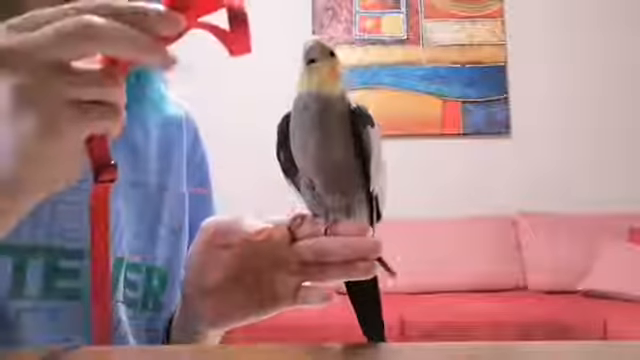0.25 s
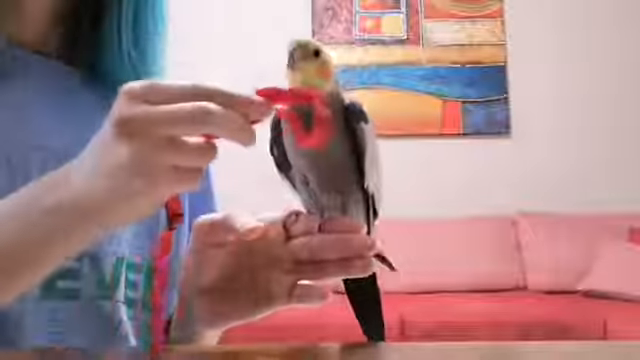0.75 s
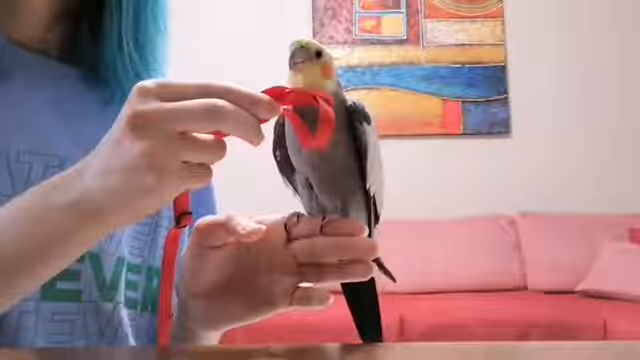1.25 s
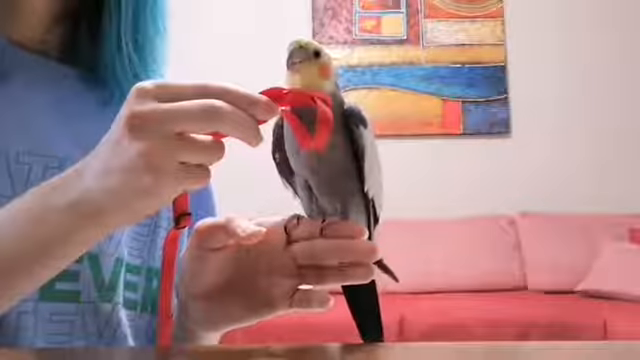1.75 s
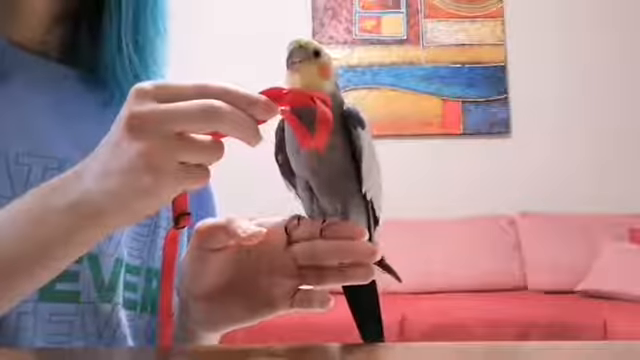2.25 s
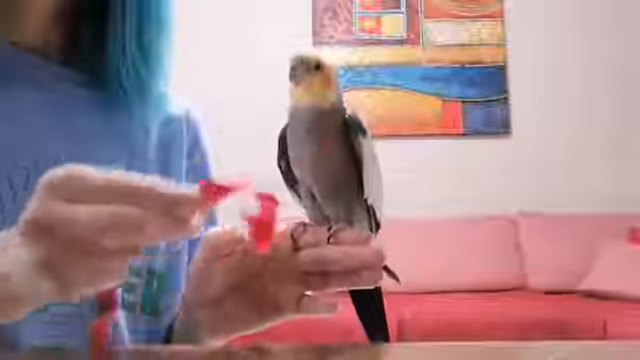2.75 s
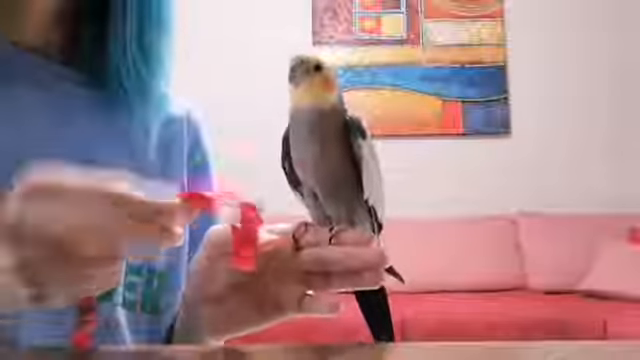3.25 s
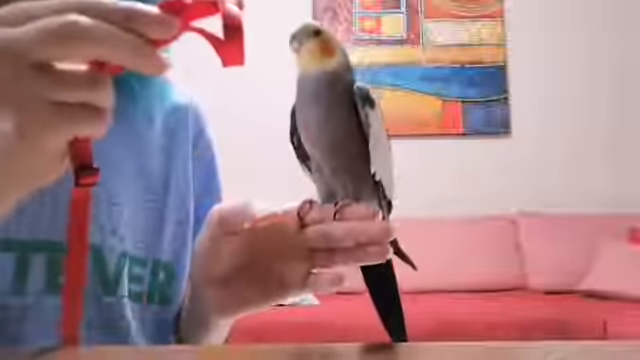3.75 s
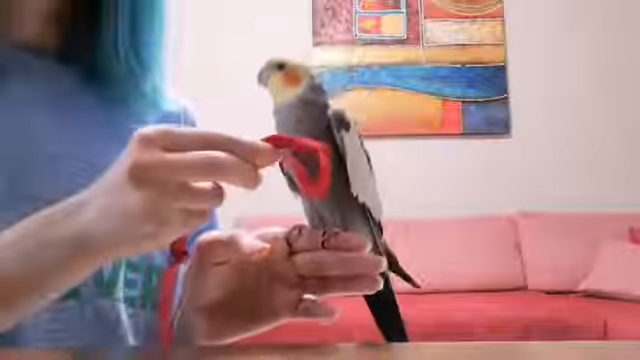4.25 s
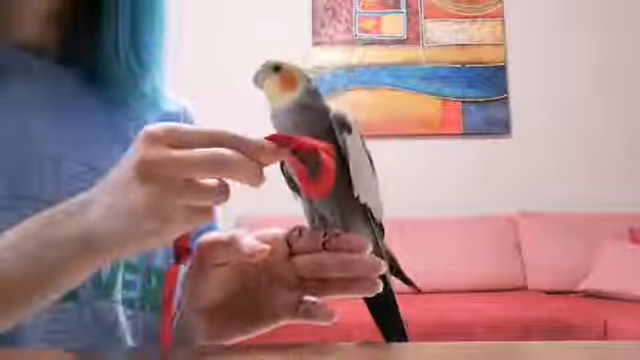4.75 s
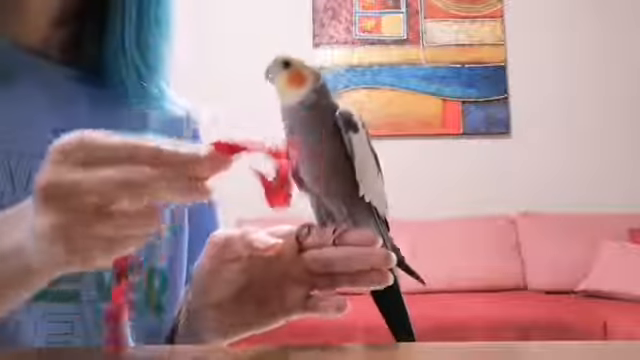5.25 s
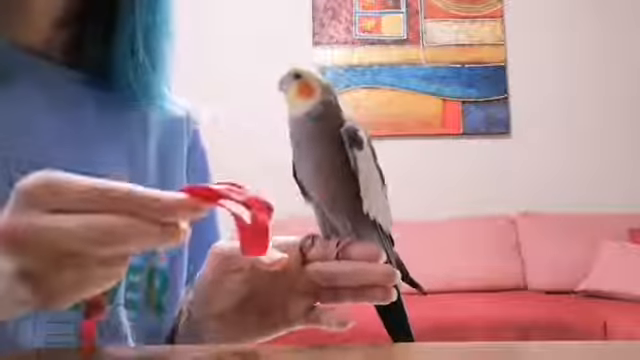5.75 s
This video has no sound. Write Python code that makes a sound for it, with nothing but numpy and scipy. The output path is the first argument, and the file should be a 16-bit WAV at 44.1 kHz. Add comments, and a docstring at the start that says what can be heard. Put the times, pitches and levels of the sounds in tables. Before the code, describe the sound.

A cockatiel protests close to two microphones in a living room with short reverberation. A nasal chirp breaks upward, followed by a tiny squawk and soft sagging whine. A long, raspy, fast-throbbing screech sinks and clears. After a pause come another chirp, a clipped squawk, a shorter, purer screech, faint beak clicks and a hissed squawk sliding into a whine. Quiet room tone and faint rumble lie beneath.

```python
"""A cockatiel on a hand in a living room protests at a harness held up to it. Its syrinx is a phase oscillator
with overtones, half-pitch tones and coloured noise: two nasal chirps, each followed by a squawk, a soft whine
after the first squawk, two throbbing screeches that sink in pitch, and a hissed squawk sliding into a whine.
Two microphones stand close by; the table adds a delayed copy and decaying noise tails make the room ring.
A faint room tone lies beneath, with a low rumble that swells now and then."""
import sys
import numpy as np
from scipy import signal
from scipy.fft import rfft, irfft, next_fast_len
from scipy.io import wavfile
from scipy.ndimage import map_coordinates

SR = 44100
rng = np.random.default_rng(int(sys.argv[2]) if len(sys.argv) > 2 else 0)


def generate_wav(signal):
    """Clip the signal to [-1, 1] and save it as 16-bit WAV at the path in sys.argv[1]."""
    frames = np.transpose(np.atleast_2d(signal))
    scaled = np.clip(frames, -1, 1) * 32767
    pcm = np.round(scaled).astype(np.int16)
    wavfile.write(sys.argv[1], SR, pcm)


N = 265041
TIME = np.arange(N) / SR

# overtones of the whistled voice, before the gain each call gives them: multiple of the pitch, level/dB
VOICE_OVERTONES = [(2, -25), (3, -51.5), (4, -49), (5, -57), (6, -63.5), (8, -57)]
# noise spectrum of the irregular syrinx in squawks, clicks and whines: f/Hz, relative density/dB per Hz
SQUAWK_RASP = [(200, -42.5), (850, -4), (1500, 6.5), (2700, -4), (3500, -30.5), (13000, -52)]
# noise spectrum of air hissing through the beak: f/Hz, relative density/dB per Hz
BEAK_HISS = [(400, -47), (1500, -12.5), (3300, -2), (3750, 1), (4100, 1.5), (5000, 0), (6300, -19),
             (7000, -14), (8000, -39), (10000, -30), (13000, -40.5)]


def amp(db):
    """Level to amplitude: 20 dB is a factor of ten."""
    return 10 ** (np.asarray(db) / 20)


def unit(x):
    """Normalisation to an rms amplitude of 1."""
    return x / np.sqrt(np.mean(x ** 2) + 1e-20)


def along(points, hz):
    """Linear interpolation of (f, value) points over logarithmic frequency."""
    f, values = np.transpose(points)
    return np.interp(np.log(hz + 1), np.log(f), values)


def curves(rows, t):
    """Linear interpolation in time of each column after the first."""
    knots, *columns = np.transpose(rows)
    return [np.interp(t, knots, column) for column in columns]


def span(rows, edge_s=.003):
    """Time window of a call: its sample indices, their times and a gate with linear ramps."""
    i = np.flatnonzero((TIME > rows[0][0]) & (TIME < rows[-1][0]))
    t = TIME[i]
    to_edge = np.minimum(t - t[0], t[-1] - t)
    return i, t, np.clip(to_edge / edge_s, 0, 1)


def wobble(t, rate):
    """Band-limited random fluctuation: a spline through normal random knots, rate knots per unit of t."""
    at = (t - t[0]) * rate
    knots = rng.standard_normal(int(at[-1]) + 4)
    return map_coordinates(knots, [at + 1])


def filtered(x, response):
    """Linear filtering: the spectrum is multiplied by a response of frequency."""
    n = x.shape[-1]
    padded = next_fast_len(n + 8192)
    hz = np.fft.rfftfreq(padded, 1 / SR)
    return irfft(rfft(x, padded) * response(hz), padded)[..., :n]


def noise(spectrum, n):
    """Spectral shaping of white noise, brought to rms 1."""
    return unit(filtered(rng.standard_normal(n), lambda hz: amp(along(spectrum, hz))))


def cycles(t, pitch, jitter):
    """Phase in radians as the integral of a pitch that trembles by the share jitter."""
    trembling = pitch * (1 + jitter * wobble(t, 500))
    return 2 * np.pi * np.cumsum(trembling) / SR


def partials(phase, table, slip=0):
    """Fourier synthesis on whole and half multiples of one phase."""
    return sum(amp(db) * np.sin(np.round(2 * k) / 2 * phase + slip) for k, db in table)


def screech(shape, throb, sink_toward_hz, shut_db, rasp_dip_db, overtone_db, overtone_grows):
    """Amplitude and frequency modulation by throbbing air pressure, with period doubling and rasp."""
    # half-pitch buzz of paired cycles: multiple of the pitch, level/dB before the pairing gain
    buzz = [(.5, -2.5), (1.5, -12.5), (2.5, -23), (3, -22), (3.5, -33.5), (4, -32), (5, -39.5),
            (6.5, -43.5), (7, -38.5)]
    # noise of the irregular syrinx: f/Hz, relative density/dB per Hz
    rasp_spectrum = [(150, -46), (400, -23.5), (600, -23), (850, -9.5), (1280, 3), (1950, -1), (2400, -14),
                     (3200, -39), (5600, -40.5), (6500, -47), (12500, -49)]
    i, t, gate = span(shape)
    crest_hz, level_db, share, rasp_db = curves(shape, t)

    # scatter from throb to throb
    crest_hz = crest_hz * (1 + .0118 * wobble(t, 35))
    level_db = level_db + .82 * wobble(t, 35)
    rasp_db = rasp_db + 1 * wobble(t, 35)
    depth = 1 + .17 * wobble(t, 50)

    rate, = curves(throb, t)
    turn = np.cumsum(rate) / SR
    turn = turn - np.interp(throb[0][0], t, turn)  # whole numbers at the crests
    slack = np.sin(np.pi * turn) ** 2  # 0 at the crest of a throb, 1 between two
    dip_hz = np.minimum(sink_toward_hz - crest_hz, -70)
    pitch = crest_hz + dip_hz * depth * np.tanh(slack)

    # the tone trails the pitch arch a little; it snaps open before each crest and fades after it
    lag = .034  # share of a throb
    offset = 2 * (turn - lag - np.round(turn - lag))  # half throbs from the nearest crest
    beyond = np.abs(offset) - share + .1 * wobble(t, 70)
    softness = np.where(offset < 0, .09, .2)  # opening, closing, in half throbs
    voiced = (1 - np.tanh(beyond / softness)) / 2

    # the more rasp, the more the cycles pair up and scatter in timing, least at the crests
    rough = .36 * amp(rasp_db)
    pairing_db = -5 + 1.65 * rasp_db
    phase = cycles(t, pitch, jitter=.008)
    scattered = phase + rough * (.25 + slack) * wobble(t, 1100)
    overtone_gain = amp(overtone_db + overtone_grows * (rasp_db - rasp_db.mean()))
    overtone_phase = phase + .24 * rough * wobble(t, 660)
    overtones = voiced * overtone_gain * partials(overtone_phase, VOICE_OVERTONES)
    halves = partials(phase, buzz, slip=wobble(t, 400))  # period doubling that keeps slipping
    opening = voiced + amp(shut_db) * (1 - voiced)
    voice = opening * (np.sin(scattered) + overtones + amp(pairing_db) * halves)

    crest_clear_db = -6 * (1 - slack) ** 2  # the rasp is weakened at the crest
    rasp_gain = amp(rasp_db + 1.5 + rasp_dip_db * slack + crest_clear_db)
    rasp = rasp_gain * noise(rasp_spectrum, len(t))
    out = np.zeros(N)
    out[i] = gate * amp(level_db) * (voice + rasp)
    return out


def long_screech():
    """Modulated oscillation that leaps up in pitch, then sinks and clears."""
    # course: t/s, crest pitch f/Hz, level/dB, open share of a throb (0-1), roughness/dB
    shape = [(1.006, 1306, -35.5, 0.63, -10), (1.036, 1405, -19.5, 0.84, -15),
             (1.08, 1850, -24.5, .46, -4.5), (1.37, 1953, -22.5, 0.4, -3.5), (1.75, 1801, -22, .37, -6),
             (2.0, 1710, -19.5, .3, -8.5), (2.33, 1560, -22, .42, -8.5), (2.59, 1464, -21.5, .5, -10),
             (2.672, 1190, -25, 0.69, -20.5)]
    # throbbing from the first crest on: t/s, rate/throbs per s
    throb = [(1.034, 39.7), (1.225, 35.1), (1.412, 37), (1.51, 34.5), (1.821, 38.8), (2.014, 34.8),
             (2.238, 36.1), (2.652, 32.2)]
    return screech(shape, throb, sink_toward_hz=1084, shut_db=-20, rasp_dip_db=-10,
                   overtone_db=-7, overtone_grows=.4)


def short_screech():
    """Modulated oscillation of a purer tone that turns harsh only in its middle."""
    # course: t/s, crest pitch f/Hz, level/dB, open share of a throb (0-1), roughness/dB
    shape = [(4.617, 1229, -23.5, 0.87, -19.5), (4.675, 1474, -17.5, 0.73, -23.5),
             (4.85, 1439, -17, .92, -28.5), (4.925, 1367, -19.5, .64, -20),
             (5.049, 1400, -17.5, 0.4, -14.5), (5.092, 1352, -18, .78, -28), (5.182, 1261, -17, 0.6, -31),
             (5.263, 1185, -23, .74, -27)]
    # throbbing from the first crest on: t/s, rate/throbs per s
    throb = [(4.644, 31.3), (4.888, 33.5), (4.898, 39.1), (5.111, 32.6)]
    return screech(shape, throb, sink_toward_hz=1176, shut_db=-13, rasp_dip_db=1,
                   overtone_db=1, overtone_grows=-.8)


def half_closed_beak(hz, depth_db=-11, width=.029):
    """Antiresonance: the mouth cuts narrow gaps, width in log frequency, into the screeches' treble."""
    gaps_hz = np.array([[4080], [4950], [6350], [10300]])
    distance = np.log((hz + 1) / gaps_hz) / width
    return amp(depth_db * np.exp(-distance ** 2).sum(0))


def chirps():
    """Source and filter: a gliding harmonic stack, each partial fluttering, meets the throat's resonances."""
    # nasal chirps, the first breaking upwards near its end:
    # t/s, pitch f/Hz, level/dB before the throat, brightness/dB per octave
    chirp_rows = [
        [(.396, 882, -68.5, -19.5), (.405, 894, -30.5, -12.5), (.413, 974.5, -27, -4.5), (.445, 1046, -28.5, 1),
         (.469, 1127, -26, -4.5), (.474, 1128, -25.5, -8), (.476, 1559, -24.5, 1), (.497, 1525, -32.5, 3.5),
         (.508, 1463, -45, -4.5)],
        [(3.893, 1047, -46, -18), (3.902, 1003, -29, -3.5), (3.927, 985.3, -29.5, -2.5),
         (3.941, 1089, -25.5, 0), (3.957, 1115, -24, -6), (3.971, 1096, -26, -8), (3.984, 987, -49, -19)],
    ]
    # throat with the beak wide open: f/Hz, gain/dB
    open_beak = [(1550, 0.5), (1950, 4.5), (2250, -13), (3000, 6), (3400, -2.5), (4500, 2.5), (5000, -11),
                 (6600, -11), (7200, -43.5), (8400, -30), (9300, -37), (13000, -52.5)]
    out = np.zeros(N)
    for rows in chirp_rows:
        i, t, gate = span(rows)
        pitch, level_db, bright = curves(rows, t)
        phase = cycles(t, pitch, jitter=.003) + .026 * wobble(t, 900)  # timing scatter in radians
        k = np.arange(1, 13)[:, None]  # harmonic numbers
        flutter_db = .8 * np.log2(k) * np.array([wobble(t, 70) for _ in k])
        partial_db = along(open_beak, k * pitch) + bright * np.log2(k) + flutter_db
        stack = amp(partial_db) * np.sin(k * phase)
        out[i] += gate * amp(level_db) * stack.sum(0)
    return out


def whistle(phase, half_db):
    """Period doubling: a whistled tone with overtones gains partials at half its pitch."""
    # tones present when every other cycle is stronger: multiple of the pitch, level/dB before half_db
    half_tones = [(.5, -9), (1.5, 2), (2.5, -27), (3.5, -31.5)]
    overtones = amp(-6.5) * partials(phase, VOICE_OVERTONES)
    return np.sin(phase) + overtones + amp(half_db) * partials(phase, half_tones)


def squawks():
    """Onset of self-oscillation: hiss and rasp give way to a period-doubled whistle."""
    # t/s, pitch f/Hz, tone level/dB, half-pitch level/dB re tone, rasp level/dB, hiss level/dB
    squawk_rows = [
        [(.642, 1565, -67, -4.5, -38.5, -64), (.654, 1527, -41, -3, -30.5, -58),
         (.664, 1611, -27.5, -7.5, -25.5, -64.5), (.684, 1362, -44.5, -9, -45.5, -79)],
        [(4.212, 1437, -55.5, -2.5, -49, -60.5), (4.234, 1438, -43.5, -1, -30, -58),
         (4.258, 1470, -27, -3, -41, -60), (4.271, 1334, -31.5, -28, -40, -63.5)],
        [(5.609, 1993, -66, -14, -55, -39.5), (5.63, 1981, -54, -32.5, -39.5, -27),
         (5.656, 1890, -31, -29, -35.5, -27), (5.674, 1442, -26, -25, -34.5, -52),
         (5.704, 1477, -16.5, -37, -53, -49.5), (5.722, 1238, -20.5, -35.5, -53, -57),
         (5.753, 1179, -22, -28, -58.5, -58)],
    ]
    out = np.zeros(N)
    for rows in squawk_rows:
        i, t, gate = span(rows)
        pitch, tone_db, half_db, rasp_db, hiss_db = curves(rows, t)
        phase = cycles(t, pitch, jitter=.002)
        tone = amp(tone_db) * whistle(phase, half_db)
        grit = unit(amp(1.5 * wobble(t, 900)))
        rasp = amp(rasp_db) * noise(SQUAWK_RASP, len(t))
        hiss = amp(hiss_db) * noise(BEAK_HISS, len(t))
        out[i] += gate * (tone + grit * (rasp + hiss))
    return out


def whines():
    """Frequency glide: a brief rasp opens a tone that swells and fades as its pitch sags ever faster."""
    # soft whines after a squawk: start t/s, length t/s, opening pitch f/Hz, peak tone level/dB,
    # half-pitch level/dB re tone, opening rasp level/dB
    whine_rows = [(0.755, .12, 1323, -18.5, -18.5, -36.5), (5.751, .099, 1338, -17.5, -25, -28.5)]
    sag, arch_db = .1, 10  # share of the pitch lost; level of the ends below the peak
    clears_db_per_s = 548.5  # decay of the opening rasp
    out = np.zeros(N)
    for start, length, hz, peak_db, half_db, rasp_db in whine_rows:
        i, t, gate = span([(start,), (start + length,)])
        u = (t - start) / length
        phase = cycles(t, hz * (1 - sag * u ** 2), jitter=.0022)
        tone_db = peak_db - arch_db * np.abs(2 * u ** .8 - 1)
        tone = amp(tone_db) * whistle(phase, half_db)
        rasp = amp(rasp_db - clears_db_per_s * (t - start)) * noise(SQUAWK_RASP, len(t))
        out[i] += gate * (tone + rasp)
    return out


def beak_whistle(centre_s=5.655, length_s=.019, hz=3730, level_db=-27):
    """Aerodynamic whistle: a trembling sine under a Gaussian envelope, while the last squawk hisses."""
    envelope = np.exp(-((TIME - centre_s) / length_s) ** 2)
    return amp(level_db) * envelope * np.sin(cycles(TIME, hz, jitter=.00867))


def clicks(t60_s=.029):
    """Impulsive excitation: the beak's soft snaps are noise bursts that decay exponentially."""
    # beak clicks around the start of the last squawk: t/s, opening hiss level/dB
    click_rows = [(5.529, -57), (5.579, -45), (5.586, -49.5), (5.611, -43.5)]
    out = np.zeros(N)
    t = TIME[:SR // 20]
    for start, level_db in click_rows:
        burst = noise(BEAK_HISS, len(t)) + amp(-8.5) * noise(SQUAWK_RASP, len(t))
        out[round(start * SR):][:len(t)] += amp(level_db - 60 * t / t60_s) * burst
    return out


def direct(x, lag_s=.000065, table_db=-15):
    """Interaural-style delay and interference: right leads left, and the table adds a weak late copy."""
    # balance of the two microphones: f/Hz, left minus right level/dB
    balance = [(2000, -0.5), (3000, -4.5)]
    side = np.array([[1], [-1]])  # left, right
    table_delay_s = np.array([[.00142], [.00130]])

    def response(hz):
        """Superposition of the direct path and the table's reflection."""
        port = amp(side * along(balance, hz) / 2) * np.exp(-1j * np.pi * hz * lag_s * side)
        return port * (1 + amp(table_db) * np.exp(-2j * np.pi * hz * table_delay_s))

    return filtered(x, response)


def room(x, gap_s=.007, patchy_db=3, patch_hz=110):
    """Reverberation: each microphone gets its own decaying noise tail, which favours some narrow bands."""
    # reverberation time: f/Hz, t/s for a decay of 60 dB
    decay = [(1300, 0.44), (3500, 0.46), (12000, 0.17)]
    # sound sent to the room, as the beak throws its treble past the microphones: f/Hz, level/dB
    send = [(1300, -14), (2200, -9.5), (3200, -6)]
    hz, t, spectra = signal.stft(rng.standard_normal((2, SR * 3 // 4)), SR, nperseg=256)
    fading = spectra * amp(-60 * t / along(decay, hz)[:, None])
    tail = signal.istft(fading, SR, nperseg=256)[1]
    # the bands grow more uneven up to 4 kHz
    tail = filtered(tail, lambda hz: amp(patchy_db * np.clip(hz / 4000, 0, 1) * wobble(hz, 1 / patch_hz)))
    tail = tail / np.linalg.norm(tail[0])
    tail = np.pad(tail, ((0, 0), (int(gap_s * SR), 0)))
    sent = filtered(x, lambda hz: amp(along(send, hz)))
    return signal.fftconvolve(sent[None], tail, axes=1)[:, :N]


def room_tone(level_db=-71, apart_db=-1):
    """Partial coherence: faint noise partly shared by both microphones, plus a shared swelling rumble."""
    # steady room noise: f/Hz, relative density/dB per Hz
    tone_spectrum = [(15, -29), (25, 2.5), (169, -11.5), (203, -13.5), (250, -7), (285, -13), (520, -16),
                     (1520, -23.5), (3510, -27.5), (13000, -42.5)]
    # low rumble: f/Hz, relative density/dB per Hz
    rumble_spectrum = [(45, -18.5), (76, 3.5), (130, -31.5), (400, -83.5)]
    # peaks of the rumble: t/s, level/dB
    swell_rows = [(0.928, -73), (2.93, -68.5), (4.88, -62), (5.421, -65.5), (5.92, -62)]
    own = np.array([noise(tone_spectrum, N), noise(tone_spectrum, N)])
    steady = amp(level_db) * (noise(tone_spectrum, N) + amp(apart_db) * own)
    swell_s = .13  # Gaussian half-width at 1/e
    swells = sum(amp(db) * np.exp(-((TIME - peak) / swell_s) ** 2) for peak, db in swell_rows)
    return steady + swells * noise(rumble_spectrum, N)


def scene():
    """Superposition of the bird's direct sound, its reverberation and the room tone."""
    screeches = filtered(long_screech() + short_screech(), half_closed_beak)
    bird = screeches + chirps() + squawks() + whines() + beak_whistle() + clicks()
    return direct(bird) + room(bird) + room_tone()


def record(dry):
    """Band limitation: nothing passes at or above 13350 Hz."""
    return filtered(dry, lambda hz: hz < 13350)


dry = scene()
out = record(dry)
generate_wav(out)
```